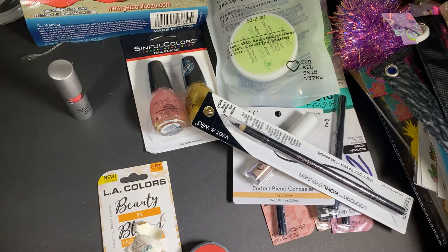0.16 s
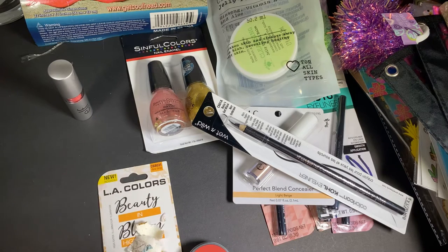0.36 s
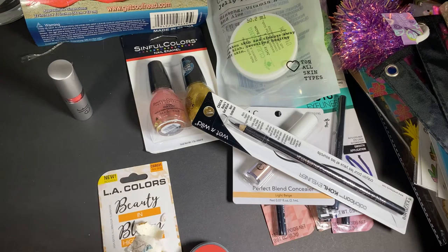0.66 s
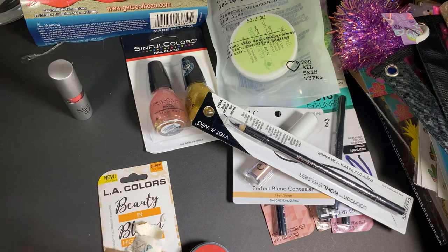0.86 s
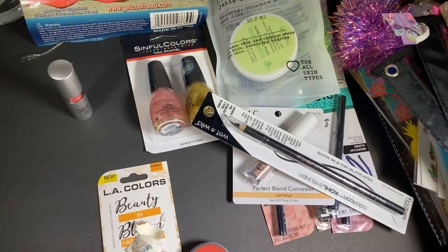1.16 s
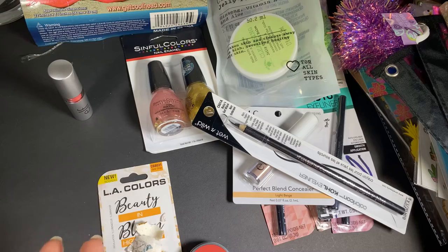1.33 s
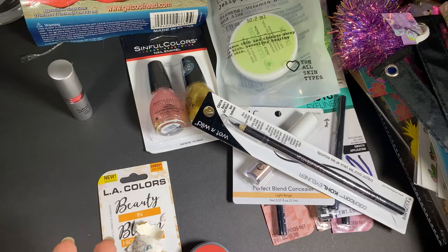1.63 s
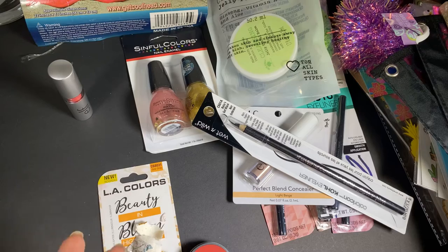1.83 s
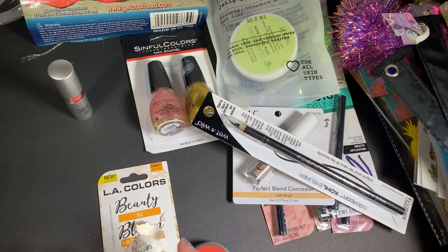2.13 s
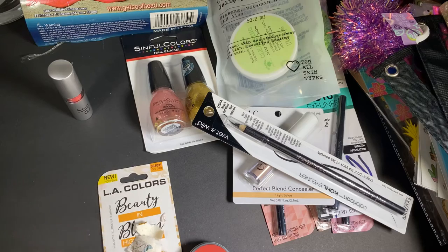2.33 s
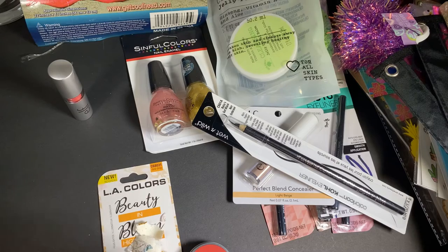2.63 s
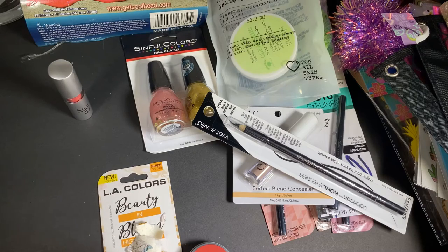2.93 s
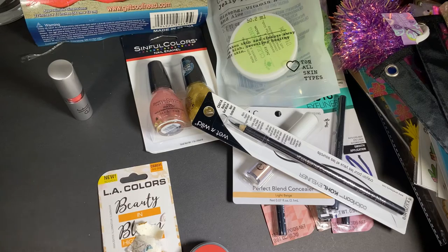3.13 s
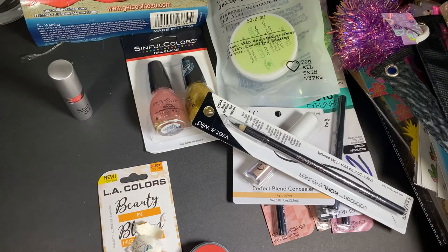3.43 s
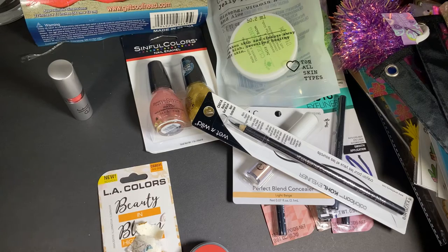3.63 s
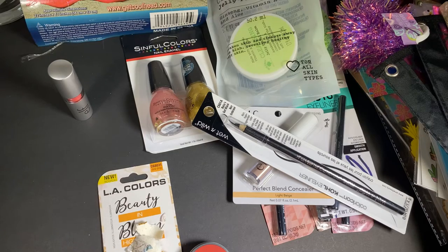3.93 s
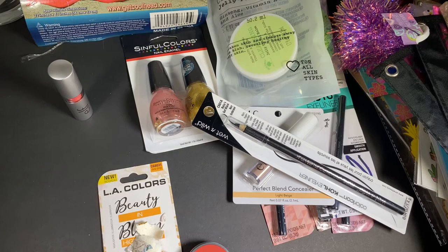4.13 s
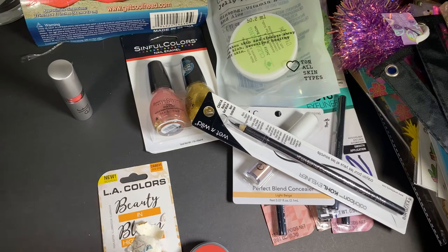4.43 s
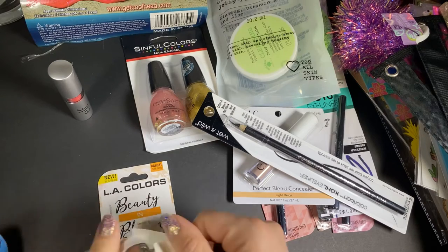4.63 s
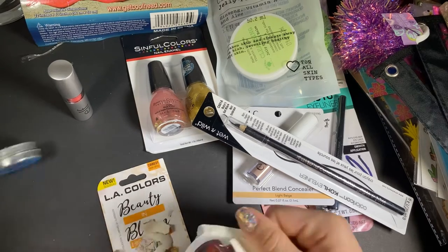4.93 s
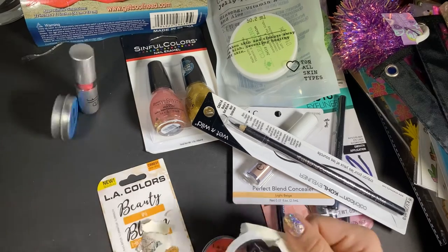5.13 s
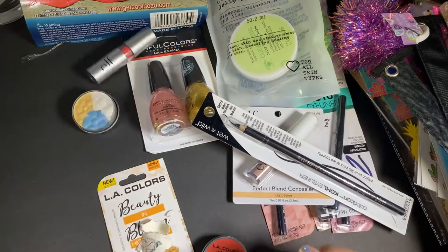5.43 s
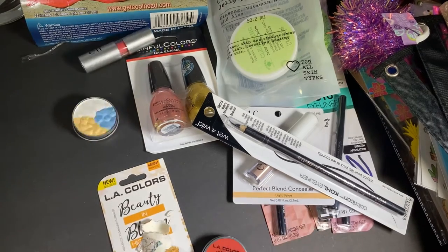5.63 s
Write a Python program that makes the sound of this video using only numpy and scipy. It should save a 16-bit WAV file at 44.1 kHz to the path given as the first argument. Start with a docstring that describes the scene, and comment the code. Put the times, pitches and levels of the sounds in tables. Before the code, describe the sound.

Plastic packaging crinkles and clicks, then a little tin hits a desk loudly, rolls and knocks over a lipstick, over a low hum.

```python
"""Fingers pry at a stiff plastic blister pack: it scrapes, crinkles, squeaks and snaps.
The skin sticks and slips on the plastic, and small flat patches (facets) flip with a crack.
A small tin pops out, hits the desk, bounces, rolls, knocks a lipstick tube over and wobbles
on its face; each blow rings both the object and the desk. A mains hum fills the small room."""
import sys
import numpy as np
from scipy import signal
from scipy.fft import rfft, irfft, next_fast_len
from scipy.io import wavfile
from scipy.ndimage import map_coordinates

SR = 44100
rng = np.random.default_rng(int(sys.argv[2]) if len(sys.argv) > 2 else 0)


def to_wav(s):
    """Save 16-bit WAV."""
    ch = np.atleast_2d(s).T  # columns
    pcm = np.round(np.clip(ch, -1, 1) * 32767)  # PCM
    wavfile.write(sys.argv[1], SR, pcm.astype(np.int16))


N = 254929
TIME = np.arange(N) / SR
AGE = TIME[:SR // 4]  # seconds since the start of one short sound

# The tone of the room's air. Each row: frequency in Hz, level in dB.
AIR_COLOUR = [(20, -13), (40, -1.5), (65, -2.5), (110, 3), (190, -5), (350, -4.5), (600, -12.5), (950, -12),
              (1300, -17), (2200, -22), (7000, -25.5), (10000, -32), (16000, -34)]
# Fingers slide over the plastic. Each row: start and length in seconds, rub and fizz levels in dB.
FINGER_STROKES = [(0,0.42,-70,-75.5), (.225,0.042,-62.5,-52.5), (.315,0.053,-54.5,-46.5),
                  (.51,0.018,-63,-56.5), (.703,0.0086,-61,-60), (1.105,0.087,-70.5,-64),
                  (1.205,0.0083,-60,-54), (1.40,0.019,-44.5,-51), (1.68,.13,-68.5,-74), (1.83,0.16,-58,-68),
                  (2.063,0.051,-53.5,-58), (2.105,0.081,-54,-64), (2.175,0.022,-49.5,-56),
                  (2.275,0.018,-48.5,-52), (2.345,0.036,-56,-59), (2.57,0.24,-74,-77), (2.84,0.147,-62,-64),
                  (3.005,0.034,-52.5,-55), (3.035,0.02,-52,-49), (3.08,.12,-59.5,-66),
                  (3.28,0.173,-58.5,-81), (3.80,0.19,-58,-64), (3.885,0.14,-56,-71.5),
                  (4.109,0.025,-46,-59.5), (4.15,0.083,-55,-88), (4.225,0.056,-49.5,-60),
                  (4.32,0.11,-56.5,-73), (4.48,0.13,-60,-66.5)]
# The resonances of the blister and its card. Each row: frequency in Hz, width in Hz, level in dB.
BLISTER_RESONANCES = [(540, 67, -5.5), (970, 180, 1.5), (2480, 1300, -1), (4650, 710, 2.5),
                      (6040, 1720, -6.5)]
# The tone of the fizz on the plastic's surface. Each row: frequency in Hz, level in dB.
SURFACE_COLOUR = [(3000, -30), (5200, 4), (7200, 0), (11000, 1), (16000, -4.5)]
# Skin squeaks on plastic. Each row: start and length in seconds, first and last pitch in Hz,
# level in dB, roughness as a share of the pitch.
SKIN_SQUEAKS = [(0,0.051,1430,1315,-57.5,0.16), (0.064,0.159,1320,1153,-66.5,0.11),
                (0.144,0.072,3180,2940,-65,.06), (4.032,.06,5870,5560,-61.5,0.013)]
# Sharp plastic clicks: the blister's snaps and the creak's last slow slips. Each row: start in seconds,
# click and bright edge levels in dB, ring pitch in Hz, time to fade by 60 dB and rise time in seconds.
PLASTIC_CLICKS = [(.312,-43,-27,4320,0.02,0.00034), (0.711,-56.5,-58,1830,0.059,.004),
                  (1.026,-54.5,-54.5,935,0.023,.002), (1.399,-38.5,-49,2770,0.057,0.00027),
                  (1.405,-45,-48,854,0.033,0.00054), (1.435,-46,-60.5,5650,0.041,0.0018),
                  (1.648,-34,-40,2650,0.049,.0012), (1.666,-33.5,-50,990,0.041,0.0012),
                  (1.810,-43.5,-46,2720,0.027,0.0067), (1.884,-38.5,-57,4600,0.03,0.0008),
                  (2.271,-46,-53.5,2850,0.037,.0009), (2.366,-43.5,-48,4850,0.05,.002),
                  (3.172,-43.5,-52.5,3390,0.025,.003), (3.276,-53.5,-81,2880,0.014,.001),
                  (3.3917,-35.5,-48,1980,0.016,0.00014), (3.456,-52.5,-59,3670,.018,.0003),
                  (3.477,-49.5,-55,4300,0.017,0.00033), (3.51,-47.5,-58,3670,0.016,0.00034),
                  (3.536,-42,-48,2240,0.027,0.00023), (3.656,-62.5,-56.5,4060,.02,0.00021),
                  (3.83,-67,-50.5,4220,0.0086,0.00035), (4.2216,-34,-49.5,2680,0.01,.0006)]
# Fingertips tap the hollow blister. Each row: start in seconds, level in dB.
FINGER_TAPS = [(.346,-49), (.676,-54.5), (.939,-57), (1.168,-54), (1.216,-54.5), (2.356,-49.5), (2.5,-54),
               (2.573,-55.5), (2.646,-58.5), (2.757,-58), (2.781,-61), (2.945,-55), (2.975,-56.5),
               (4.169,-55.5), (4.482,-58)]
# The tin knocks inside the pack. Each row: start in seconds, level in dB, pitch in Hz.
TIN_KNOCKS = [(1.028,-49.5,272), (1.400,-41,456), (1.406,-54,335), (1.650,-40.5,490), (1.667,-45,290),
              (1.885,-53.5,560), (2.195,-55,560), (3.536,-44.5,443), (4.221,-53.5,510)]
# A fingernail sticks and slips along the rim. Each row: time in seconds, slips per second, level in dB.
NAIL_SLIPS = [(3.29, 210, -67), (3.34, 180, -57), (3.37, 150, -50), (3.40, 100, -52), (3.445, 85, -53)]
# The tin hits the desk. Each row: start in seconds, then crack, thud, bright edge and ring levels in dB.
TIN_BLOWS = [(4.6005,-21,-15,-22.5,-26), (4.703,-26.5,-29.5,-33,-38.5), (4.7463,-40,-50.5,-52.5,-59),
             (4.8725,-65,-62,-90,-75), (5.3295,-28.5,-26,-40,-40), (5.408,-46.5,-46.5,-58,-58),
             (5.43,-47,-45.5,-72,-65)]
# The tin's modes (the notes it rings at). Each row: pitch in Hz, level in dB, seconds to fade by 60 dB.
TIN_MODES = [(960, -6, .07), (1420, 0, .13), (1713, -1, .1), (1818, -1, .12), (2203, 2, .11),
             (3650, -2, .09), (3885, 0, .09), (4204, -3, .09), (4377, -4, .08), (5453, -2, .1),
             (6780, -2, .09), (7070, -3, .1), (7750, -2, .12), (7966, 3, .19), (8120, 0, .13)]
# The desk top's modes. Each row: pitch in Hz, level in dB, seconds to fade by 60 dB.
DESK_MODES = [(62, -18, .14), (84, -10, .1), (100, -6, .12), (122, -6, .14), (158, -4, .12), (237, 3.5, .1),
              (323, 1.5, .09), (378, -1, .07), (458, 0, .085), (512, -3, .09), (595, -4, .08),
              (656, -8, .08), (852, -13, .08)]
# The tin rolls, then wobbles. Each row: start and length in seconds, rumble and scrape levels in dB.
TIN_ROLLS = [(4.70,0.063,-38,-50.5), (4.80,.12,-59,-77), (4.925,0.064,-44.5,-62.5), (5.07,0.024,-42,-47),
             (5.13,0.053,-53,-74), (5.41,0.052,-47.5,-45), (5.52,0.17,-63,-52), (5.655,0.14,-54,-51)]
# The tone of the desk's rumble. Each row: frequency in Hz, level in dB.
DESK_COLOUR = [(30, -43.5), (60, -32), (110, 13), (160, 10), (230, -8.5), (400, -13), (700, -23),
               (1500, -59)]
# The tone of the scraping rim. Each row: frequency in Hz, level in dB.
SCRAPE_COLOUR = [(150, 7.5), (330, 9.5), (700, -2), (950, 5.5), (1200, -8), (1420, 7.5), (1600, -2),
                 (2200, -2.5), (3500, -7.5), (6000, -10.5), (10000, -15.5), (16000, -20)]
# The lipstick tube is bumped, falls and rattles.
# Each row: start in seconds, then crack, thud, bright edge and ring levels in dB.
TUBE_BLOWS = [(4.987,-65,-62,-85,-55.5), (5.0536,-46.5,-47,-46.5,-37.5), (5.4855,-53,-52.5,-55,-44),
              (5.4945,-39,-44,-42.5,-33), (5.5347,-51,-58,-58,-43.5), (5.582,-59,-68,-62,-52),
              (5.6094,-60,-72,-66,-44)]
# The tube's modes. Each row: pitch in Hz, level in dB, seconds to fade by 60 dB.
TUBE_MODES = [(1200, -6, .06), (2780, -3, .09), (2960, -4, .08), (3106, -1, .09), (3300, -4, .08),
              (3480, -6, .07), (4300, -8, .07), (5850, -12, .11), (7750, -12, .1), (10630, -14, .1)]
# How long the room echoes. Each row: frequency in Hz, seconds to fade by 60 dB.
ROOM_DECAY = [(100, 0.25), (500, 0.1), (2000, 0.21), (6000, 0.18), (15000, 0.14)]


def amp(db):
    """Turn decibels into a gain."""
    return 10 ** (np.asarray(db) / 20)


def unit(x):
    """Scale a sound to an average (rms) level of 1."""
    return x / np.sqrt(np.mean(x ** 2) + 1e-20)


def struck(x):
    """Scale a blow to an average (rms) level of 1 over its first 6 milliseconds."""
    return x / np.sqrt(np.mean(x[:SR // 160] ** 2) + 1e-20)


def fade(t60):
    """A decay that falls by 60 dB in t60 seconds."""
    return np.exp(-np.log(1000) * AGE / max(t60, 1e-3))


def along(points, hz):
    """Read between (Hz, value) points on a logarithmic frequency scale."""
    freqs, values = np.transpose(points)
    return np.interp(np.log(hz + 1), np.log(freqs + 1), values)


def wobble(rate):
    """A smooth curve through `rate` random values a second."""
    return map_coordinates(rng.standard_normal(int(N * rate / SR) + 4), [TIME * rate])


def filtered(x, response):
    """Multiply each frequency of a sound by response(hz)."""
    size = next_fast_len(N + SR // 2)
    return irfft(rfft(x, size) * response(np.fft.rfftfreq(size, 1 / SR)), size)[:N]


def coloured(x, colour):
    """Give a sound the tone of a colour table, at an average level of 1."""
    return unit(filtered(x, lambda hz: amp(along(colour, hz))))


def add(track, start, sound):
    """Mix a sound in at a start time in seconds."""
    part = track[max(round(start * SR), 0):][:len(sound)]
    part += sound[:len(part)]


def envelope(start, length, attack, release_db_per_s, sag_db):
    """A movement sets in, weakens by sag_db while it lasts, and dies away."""
    age = TIME - start
    onset = np.clip(age / attack, 0, 1)
    held_db = sag_db * (.5 - np.clip(age / length, 0, 1))
    return onset * amp(held_db - release_db_per_s * np.maximum(age - length, 0))


def gains(rows, shape):
    """One gain curve for each level column of a table of movements; overlaps add in power."""
    return np.sqrt(sum(np.outer(amp(dbs), shape(start, length)) ** 2 for start, length, *dbs in rows))


def mains_hum(hum_db, air_db, hum_hz=120):
    """A mains appliance hums over quiet room air."""
    tone = unit(np.sin(2 * np.pi * hum_hz * TIME + .04 * wobble(5)))
    hum = tone * amp(.4 * wobble(2.7))
    return amp(hum_db) * hum + amp(air_db) * coloured(rng.standard_normal(N), AIR_COLOUR)


def stroke(start, length):
    """The loudness of a sliding finger; longer strokes set in more gently."""
    return envelope(start, length, attack=.0038 + .081 * length, release_db_per_s=379, sag_db=2)


def grains(rate, spread_db, smooth):
    """Tiny slips of uneven size, about `rate` a second, over a smooth friction noise."""
    sizes = amp(spread_db * np.minimum(rng.exponential(size=N), 3)) * rng.choice([-1, 1], N)
    return unit(sizes * (rng.random(N) < rate / SR)) + smooth * rng.standard_normal(N)


def patchy(x, depth_db):
    """Small resonances come and go as the grip changes."""
    spectrum = signal.stft(x, nperseg=512)[2]
    smoothing = np.outer(np.hanning(7), np.hanning(20))
    patches = signal.fftconvolve(rng.standard_normal(spectrum.shape), smoothing, "same")
    return signal.istft(spectrum * amp(depth_db * unit(patches)), nperseg=512)[1][:N]


def blister_response(hz):
    """How the blister and its card answer each frequency; neighbouring resonances alternate in sign."""
    return sum((-1) ** k * amp(db) * 1j * hz * width / (centre ** 2 - hz ** 2 + 1j * hz * width)
               for k, (centre, width, db) in enumerate(BLISTER_RESONANCES))


def rubbing(crinkle_db):
    """Fingertips drag in tiny slips and stray crinkles, which ring the blister and fizz on its surface."""
    rub, fizz = gains(FINGER_STROKES, stroke)
    drag = grains(rate=2500, spread_db=1.5, smooth=.49) * amp(1.3 * wobble(150) + 2.17 * wobble(40))
    crinkles = amp(crinkle_db) * grains(rate=55, spread_db=3.5, smooth=0)
    slips = patchy(drag + crinkles, depth_db=3.5)
    return rub * unit(filtered(slips, blister_response)) + fizz * coloured(slips, SURFACE_COLOUR)


def squeaks():
    """Thin, unsteady whistles of friction that fall as the finger slows."""
    out = np.zeros(N)
    for start, length, first_hz, last_hz, db, rough in SKIN_SQUEAKS:
        glide_hz = np.interp(TIME, [start, start + length], [first_hz, last_hz])
        hz = glide_hz * (1 + rough * wobble(1500))
        whistle = np.sin(2 * np.pi * np.cumsum(hz) / SR)
        out += amp(db + 4 * wobble(250)) * stroke(start, length) * whistle
    return out


def burst(low_hz, high_hz, t60, rise):
    """A run of tiny cracks, swelling and dying, that ring in one band; t60 and rise are in seconds."""
    band = signal.butter(2, [low_hz, high_hz], "band", fs=SR, output="sos")
    crunch_db = np.interp(AGE, AGE[::64], -rng.standard_normal(len(AGE[::64])))
    swell = 1 - np.exp(-AGE / rise)
    cracks = rng.standard_normal(len(AGE)) * amp(crunch_db) * swell * fade(t60)
    return struck(signal.sosfilt(band, cracks))


def clicks(ring_db, card_db, ring_spread):
    """The blister's snaps and the creak's last slow slips: a crack, a ring of plastic, a thud of card."""
    out = np.zeros(N)
    for start, db, edge_db, hz, t60, rise in PLASTIC_CLICKS:
        ringing = burst(hz * (1 - ring_spread), hz * (1 + ring_spread), t60, rise)
        crack = burst(870, 6000, t60, rise)
        click = struck(crack + amp(ring_db) * ringing)
        thud = burst(160, 880, .019, rise)
        edge = burst(6550, 12500, t60, rise)
        add(out, start, amp(db) * (click + amp(card_db) * thud) + amp(edge_db) * edge)
    return out


def taps(hollow_db, edge_db, thud_db, t60=.03, rise=.0019):
    """A light touch rings the blister's hollow, with a small tick of the nail."""
    out = np.zeros(N)
    for start, db in FINGER_TAPS:
        hz = 990 * np.exp(.027 * rng.standard_normal())
        hollow = amp(hollow_db) * burst(hz * .77, hz * 1.06, t60, rise)
        tick = burst(750, 6200, t60, rise) + amp(edge_db) * burst(6300, 12500, t60, rise)
        thud = amp(thud_db) * burst(220, 680, t60, rise)
        add(out, start, amp(db) * struck(tick + hollow + thud))
    return out


def knocks(band_ratio):
    """The tin bumps the card from inside: a short, dull note."""
    out = np.zeros(N)
    for start, db, hz in TIN_KNOCKS:
        add(out, start, amp(db) * burst(hz / band_ratio, hz * band_ratio, t60=.038, rise=.0025))
    return out


def nail_creak():
    """The nail's slips come slower and harder as the rim tightens."""
    times, rates, levels = np.transpose(NAIL_SLIPS)
    rate = np.interp(TIME, times, rates, left=0, right=0) * amp(.39 * wobble(80))
    db = np.interp(TIME, times, levels, left=-120, right=-120)
    slips_so_far = np.floor(np.cumsum(rate) / SR)
    out = np.zeros(N)
    for i in np.flatnonzero(np.diff(slips_so_far)):
        add(out, i / SR, amp(db[i] + rng.normal(0, 1.5)) * burst(1300, 9000, t60=.008, rise=.0002))
    return out


def ring(modes, scatter_db, attack, rough):
    """An object's modes, at new strengths for each blow; chattering contact blurs their phases."""
    out = np.zeros(len(AGE))
    for hz, db, t60 in modes:
        blur = rough * np.cumsum(rng.standard_normal(len(AGE))) * np.sqrt(hz / SR)
        strength = amp(db + rng.normal(0, scatter_db))
        out += strength * fade(t60) * np.sin(2 * np.pi * (hz * AGE + rng.random()) + blur)
    return struck(out * (1 - np.exp(-AGE / attack)))


def blows(hits, modes, crack_t60, rise, rough):
    """Metal lands on one edge and slaps down, each with a crack; the landing rings shell and desk."""
    out = np.zeros(N)
    hardest_db = max(hit[1] for hit in hits)
    for start, db, thud_db, edge_db, ring_db in hits:
        for delay, part_db in [(-.004, -19), (0, 0), (.007, -15)]:  # faint lead-in tick, landing, slap
            crack = amp(db) * burst(930, 4200, crack_t60, rise)
            edge = burst(4700, 8360, crack_t60, rise) + amp(-6) * burst(10200, 14000, crack_t60, rise)
            clatter = amp(thud_db - 7) * burst(380, 720, .05, rise)
            add(out, start + delay, amp(part_db) * (crack + amp(edge_db) * edge + clatter))
        # a blow with little edge leaves the shell's high modes quiet
        dull_db = min(edge_db - db + 2, 0)
        shell_modes = [(hz, level + dull_db * (hz > 6000), t60) for hz, level, t60 in modes]
        # a harder blow favours the desk's lower modes
        tilt_db_per_octave = -2 + .53 * (hardest_db - db)
        desk_modes = [(hz, level + tilt_db_per_octave * np.log2(hz), t60)
                      for hz, level, t60 in DESK_MODES]
        shell = ring(shell_modes, scatter_db=1.5, attack=.0005, rough=rough)
        thud = ring(desk_modes, scatter_db=1, attack=.001, rough=.06)
        push = amp(-12.5) * burst(70, 230, .11, rise)
        add(out, start, amp(ring_db) * shell + amp(thud_db) * (thud + push))
    return out


def roll(start, length):
    """The loudness of one run of the tin's rim."""
    return envelope(start, length, attack=.011, release_db_per_s=309, sag_db=1)


def rolling():
    """The tin's rim scrapes over the desk, which rumbles under it."""
    rumble_gain, scrape_gain = gains(TIN_ROLLS, roll)
    contact = grains(rate=1100, spread_db=3, smooth=.93) * amp(3.05 * wobble(36))
    rumble = coloured(rng.standard_normal(N), DESK_COLOUR)
    return rumble_gain * rumble + scrape_gain * coloured(contact, SCRAPE_COLOUR)


def room(x, echo_db, delay):
    """Near walls echo; the echo changes every quarter second, as the hands and the tin move."""
    echo, hop = np.zeros(N), SR // 4
    for i in range(0, N, hop):
        hz, age, noise = signal.stft(rng.standard_normal(len(AGE)), SR, nperseg=256)
        decay = amp(-60 * age / along(ROOM_DECAY, hz)[:, None])
        tail = signal.istft(noise * decay, SR, nperseg=256)[1]
        add(echo, i / SR + delay, signal.fftconvolve(x[i:i + hop], tail / np.linalg.norm(tail)))
    return x + amp(echo_db) * echo


def scene():
    """The pack in the hands, the tin and the tube on the desk, the room around them."""
    pack = clicks(ring_db=-1.5, card_db=-18.5, ring_spread=.098) + knocks(band_ratio=1.49)
    pack += taps(hollow_db=3.5, edge_db=-4.5, thud_db=-10.5)
    pack += rubbing(crinkle_db=-6.5) + nail_creak() + squeaks()
    tin = blows(TIN_BLOWS, TIN_MODES, crack_t60=.038, rise=.00023, rough=.36)
    tube = blows(TUBE_BLOWS, TUBE_MODES, crack_t60=.062, rise=.0016, rough=.45)
    desk = tin + tube + rolling()
    in_room = room(pack, echo_db=-8, delay=.0045) + room(desk, echo_db=-7, delay=.0046)
    return (in_room + mains_hum(hum_db=-52.5, air_db=-63.5))[None]


def record(dry):
    """The small microphone loses the deep bass, and the highest treble is cut off."""
    low_hz, top_hz = 52, 16000
    thin = signal.sosfilt(signal.butter(4, low_hz, "high", fs=SR, output="sos"), dry[0])
    return filtered(thin, lambda hz: hz < top_hz)[None]


dry = scene()
out = record(dry)
to_wav(out)
```